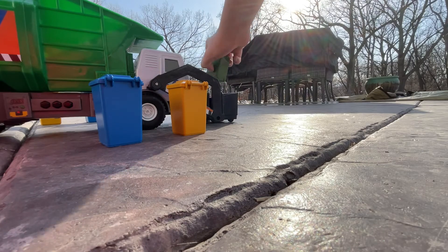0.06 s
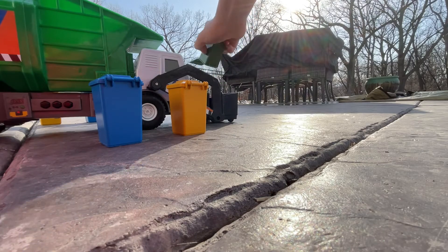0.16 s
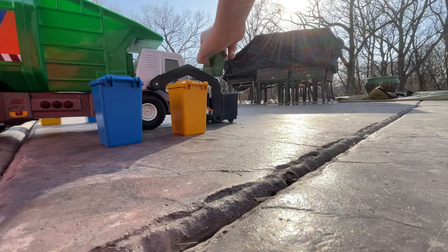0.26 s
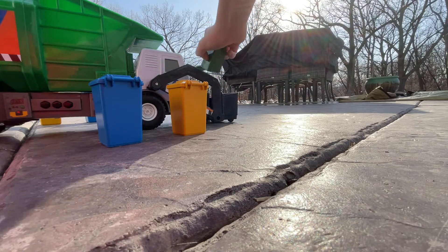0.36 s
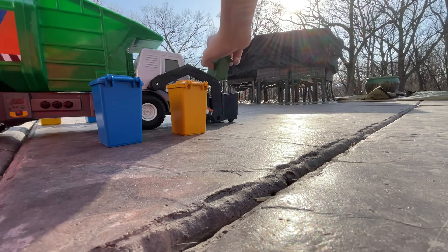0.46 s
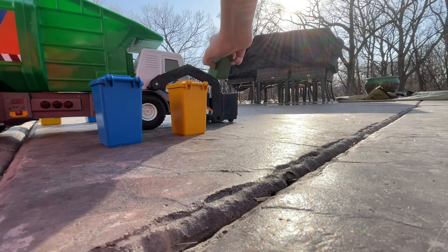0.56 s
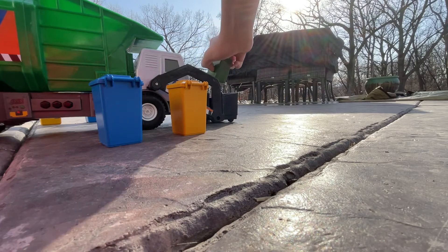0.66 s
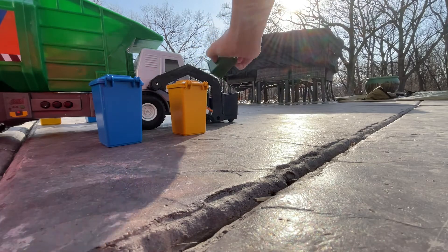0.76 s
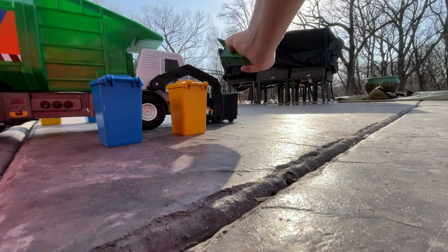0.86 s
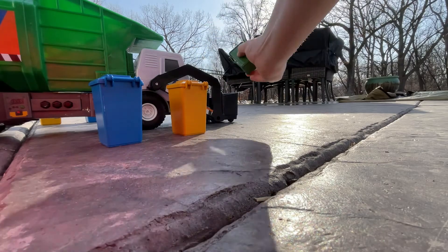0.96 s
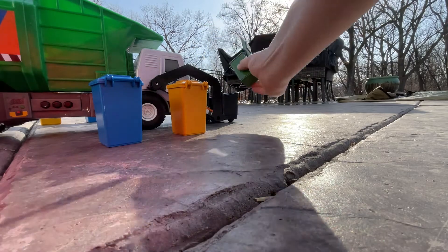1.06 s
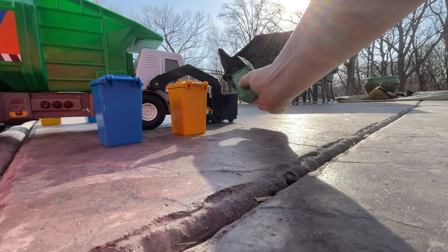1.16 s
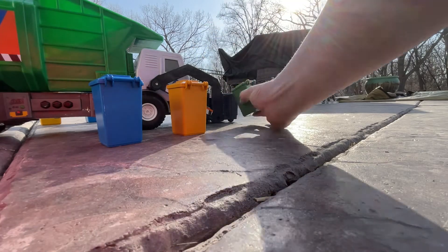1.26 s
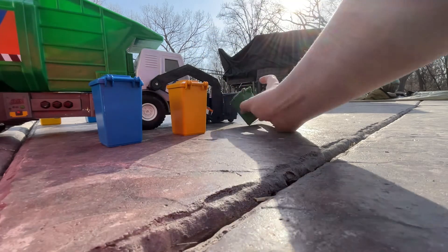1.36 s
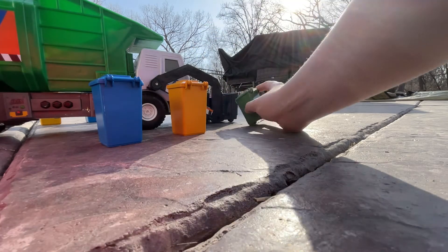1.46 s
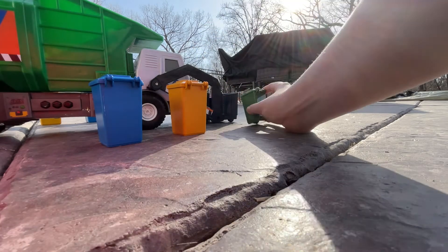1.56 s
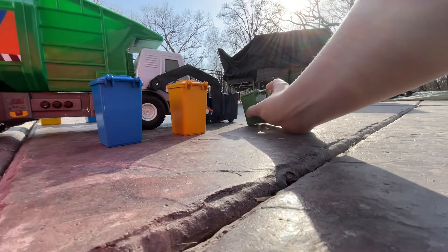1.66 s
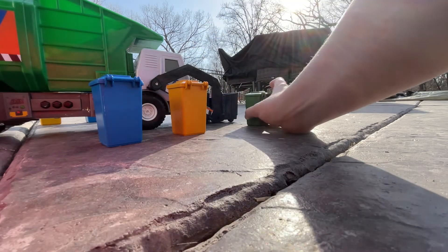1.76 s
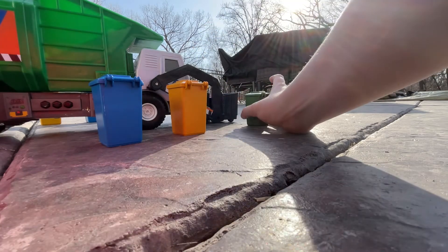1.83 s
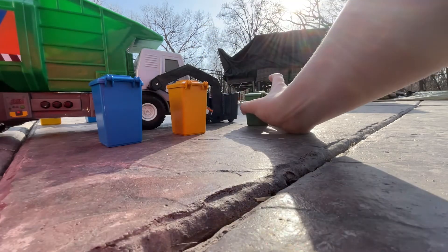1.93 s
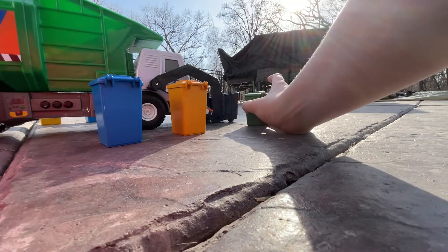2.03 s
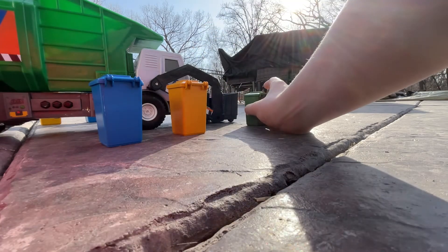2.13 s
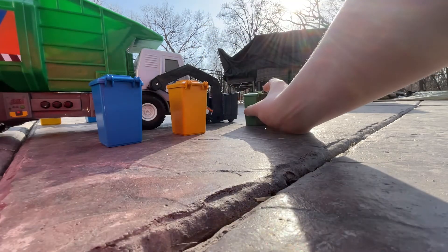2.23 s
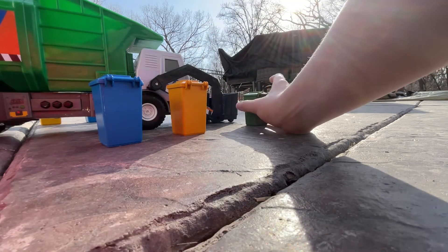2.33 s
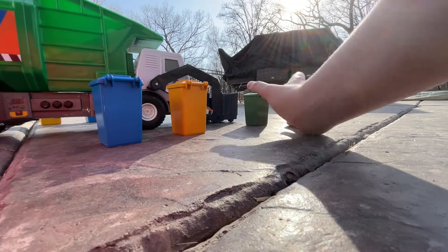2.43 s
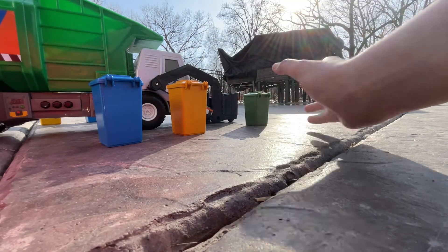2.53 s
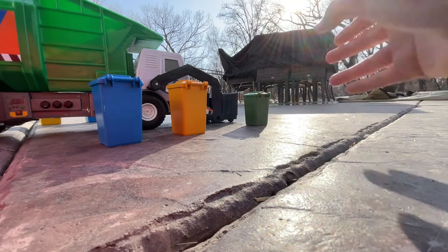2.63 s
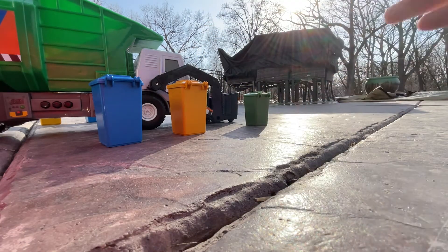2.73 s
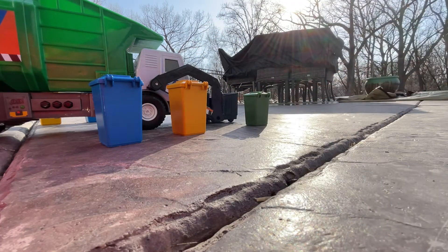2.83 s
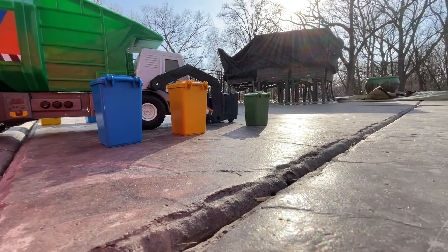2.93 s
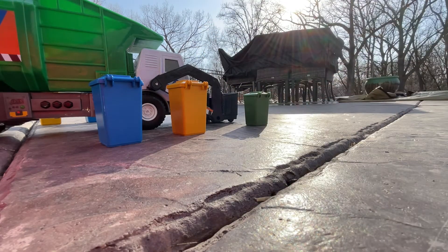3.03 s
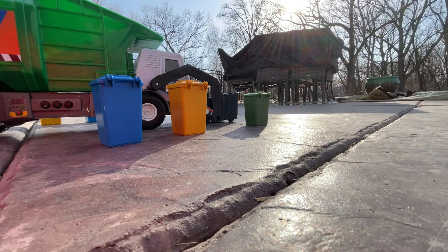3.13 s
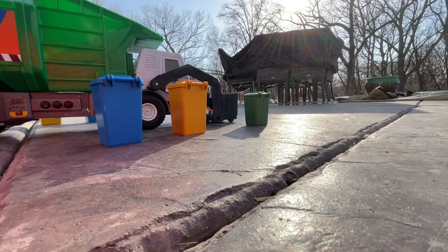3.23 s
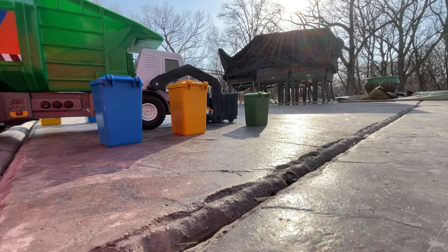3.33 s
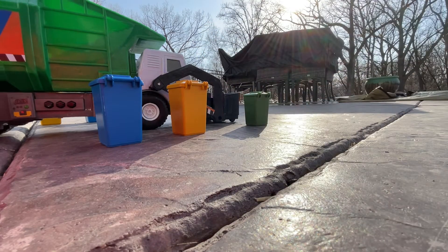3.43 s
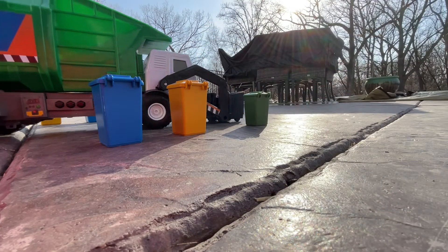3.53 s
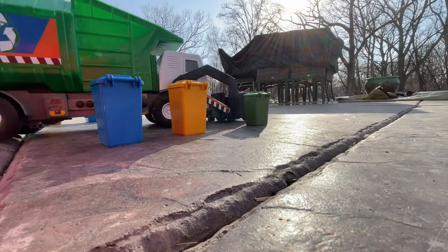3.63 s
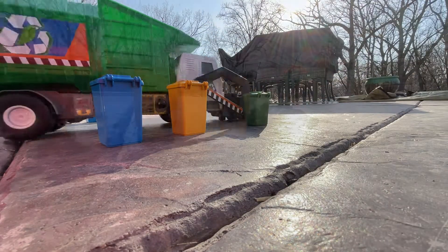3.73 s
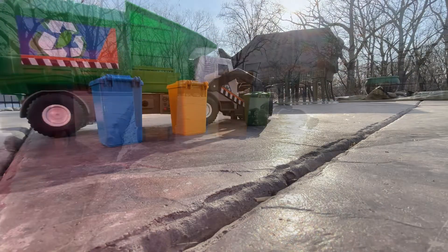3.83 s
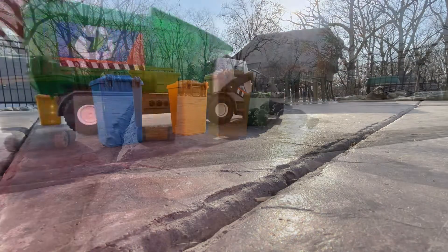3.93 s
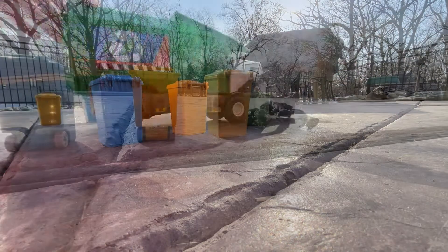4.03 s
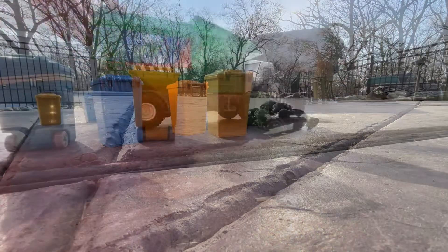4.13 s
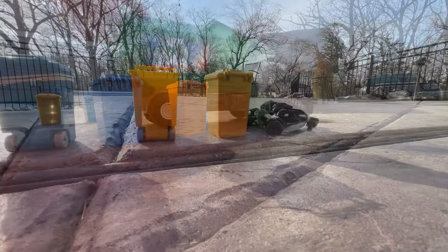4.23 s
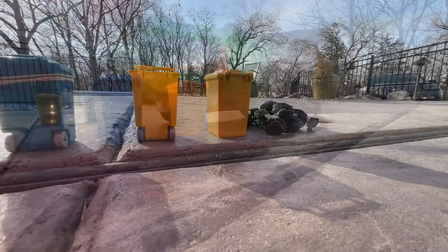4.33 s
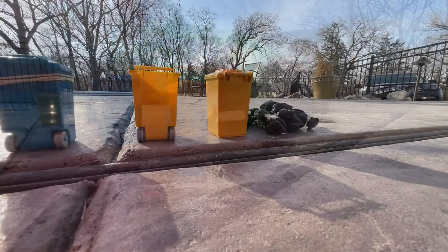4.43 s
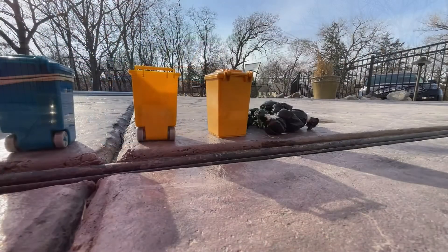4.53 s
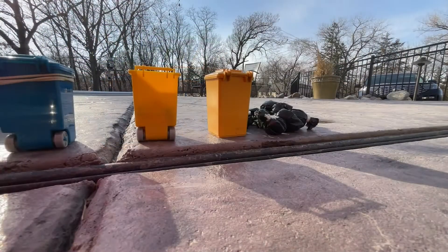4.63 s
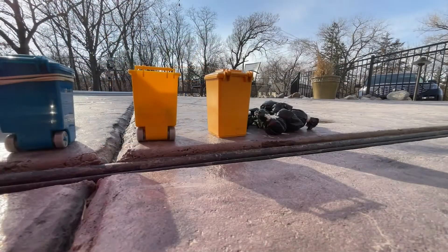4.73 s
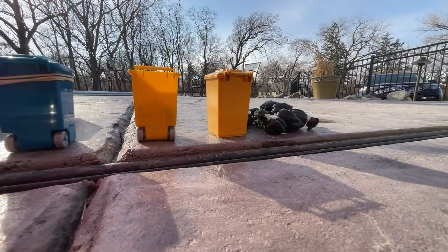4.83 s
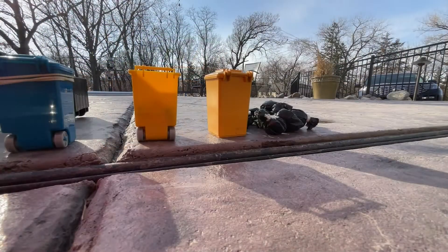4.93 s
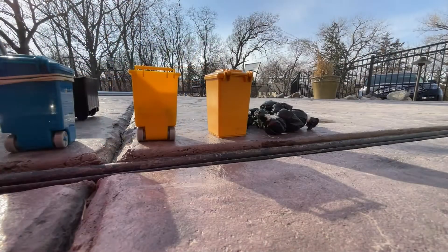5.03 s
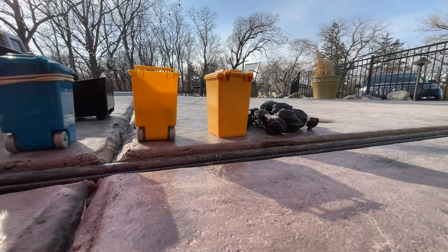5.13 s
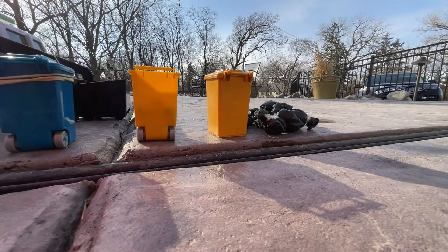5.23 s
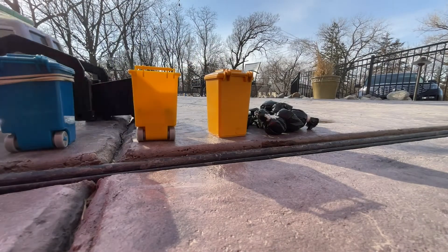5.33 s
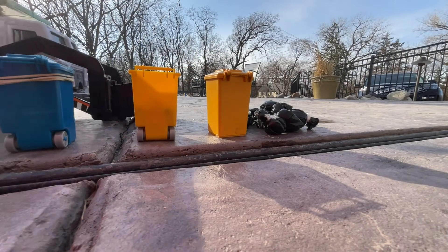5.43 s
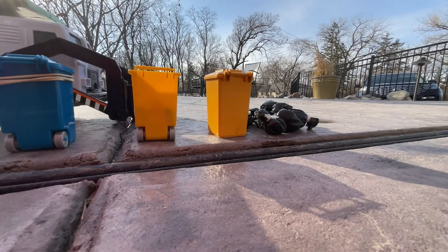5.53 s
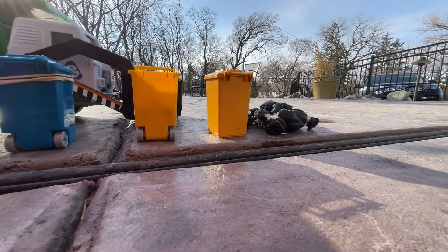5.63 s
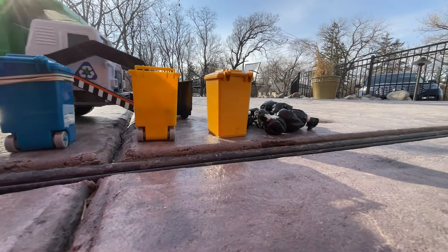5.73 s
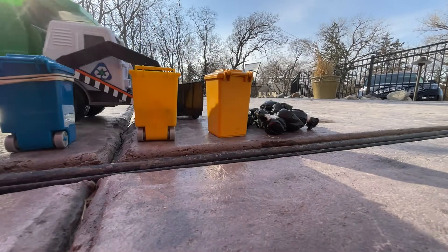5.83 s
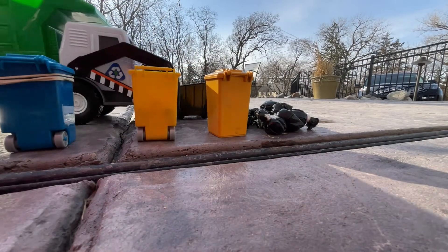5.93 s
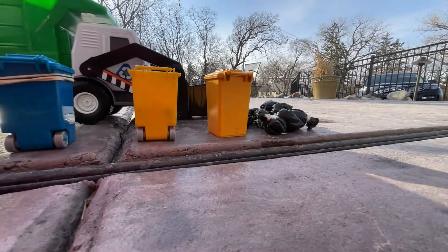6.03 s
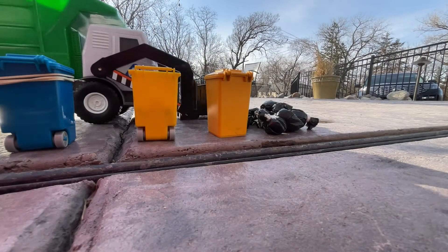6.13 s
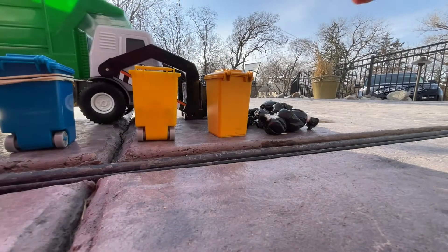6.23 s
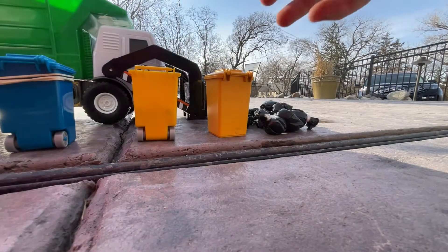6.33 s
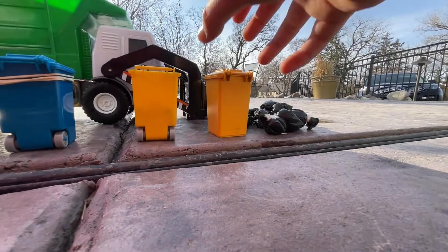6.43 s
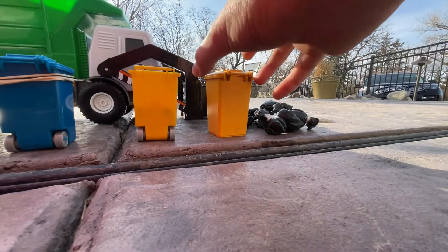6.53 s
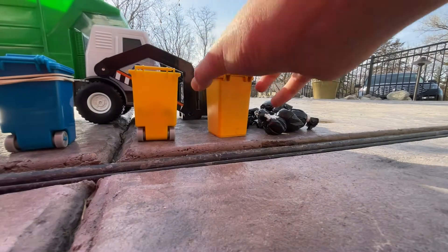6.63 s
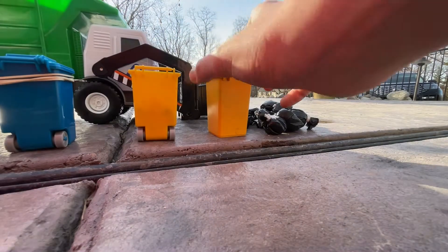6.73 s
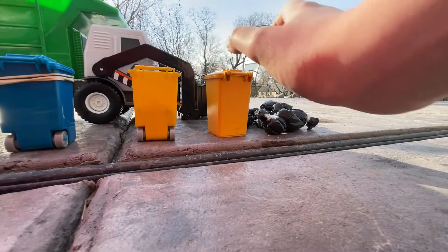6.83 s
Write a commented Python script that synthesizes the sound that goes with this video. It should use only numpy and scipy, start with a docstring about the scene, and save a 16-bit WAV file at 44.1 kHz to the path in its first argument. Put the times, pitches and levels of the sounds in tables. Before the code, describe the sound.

Close stereo microphone low on a rough slab in an open yard, with very little echo. Soft far traffic and tiny bird notes, then a cluster of dry plastic clacks and drags as a little bin is placed. A gentle hand rustle follows. A hollow toy truck clatters along with loose knocks and low rumble, slows, squeaks faintly and stops, leaving traffic and wind buffeting.

```python
"""Taps on a small plastic bin, set down on a concrete drive; a brushing hand; then a toy truck rolling by.
Far traffic and a low rumble lie beneath, birds call faintly, and late on wind buffets the close microphone ports.
Random pushes and grit ring the modes of bin and truck; shaped noise makes traffic, rumble, wheels and skin;
sliding tones make birds and squeaks, and decaying sines make thumps. Two close ports hear the near sounds
with different colour and lag, and the yard adds scatter."""
import sys
import numpy as np
from scipy import signal
from scipy.fft import rfft, irfft, next_fast_len
from scipy.io import wavfile
from scipy.ndimage import uniform_filter1d, map_coordinates

SR = 44100
rng = np.random.default_rng(int(sys.argv[2]) if len(sys.argv) > 2 else 0)


def digitize_waveform(pressure):
    """Quantize a signal to 16-bit integers and store it at the path in sys.argv[1].

    Rows of a 2-D input are taken as channels; values are limited to [-1, 1].
    """
    field = np.atleast_2d(pressure).T
    bounded = np.clip(field, -1, 1)
    quanta = np.round(bounded * 32767).astype(np.int16)
    wavfile.write(sys.argv[1], SR, quanta)


N = 303408


def amp(db):
    """dB to gain."""
    return 10 ** (np.asarray(db) / 20)


def unit(x):
    """Scale to rms 1."""
    return x / np.sqrt(np.mean(x ** 2) + 1e-20)


def along(points, hz):
    """Interpolate (Hz, value) points on a log frequency axis."""
    f, v = np.transpose(points)
    return np.interp(np.log(hz + 1), np.log(f + 1), v)


def level(rows):
    """One gain per sample from (start_s, level_db) points, all but silent outside the table."""
    s, db = np.transpose(rows)
    return amp(np.interp(np.arange(N) / SR, s, db, -150, -150))


def wobble(rate):
    """A smooth random curve, rate knots a second."""
    knots = rng.standard_normal(int(N * rate / SR) + 4)
    return map_coordinates(knots, [np.arange(N) * rate / SR])


def filtered(x, response):
    """Multiply the spectrum of x by a function of frequency."""
    m = next_fast_len(N + SR // 2)
    return irfft(rfft(x, m) * response(np.fft.rfftfreq(m, 1 / SR)), m)[..., :N]


def noise(spectrum):
    """Coloured noise of rms 1."""
    def response(f):
        return amp(np.where(f < spectrum[0][0], -120, along(spectrum, f)))
    return unit(filtered(rng.standard_normal(N), response))


def highpass4(f, corner_hz):
    """A steep high-pass without phase shift."""
    return f ** 4 / (f ** 4 + corner_hz ** 4)


def glide(start, end, first_hz, last_hz):
    """Progress 0-1 and phase of a tone that slides, quickly at first."""
    u = np.linspace(0, 1, min(round(end * SR), N) - round(start * SR))
    hz = first_hz + (last_hz - first_hz) * (1 - np.exp(-4 * u))
    return u, 2 * np.pi * np.cumsum(hz) / SR


def slide(start, end, db, fade_db_per_s, swell):
    """Gain of one sliding stroke: soft ends, a rounded swell, a steady fade."""
    edge_s = 0.003
    t = np.arange(N) / SR
    u = np.clip((t - start) / (end - start), 0, 1)
    ends = np.clip(np.minimum(t - start, end - t) / edge_s, 0, 1)
    return ends * np.abs(np.sin(np.pi * u)) ** swell * amp(db - fade_db_per_s * (end - start) * u)


def ringing(modes, f, detune=1):
    """Causal resonance of each mode, one row a mode, with alternating signs."""
    hz, db, t60 = np.transpose(modes)[:, :, None]
    hz, width = hz * detune, np.log(1000) / (np.pi * t60)
    sign = (-1.) ** np.arange(len(modes))[:, None]
    return sign * amp(db) * 1000j * f / (hz * hz - f * f + 1j * f * width)


def flexing(force, modes, stretch):
    """A shell flexes as it moves, so its modes drift between three tunings; rms 1."""
    tunings = []
    for k in (-1, 0, 1):
        rung = filtered(force, lambda f: ringing(modes, f, 1 + k * stretch).sum(0))
        tunings.append(amp(2.1 * wobble(14)) * rung)
    return unit(sum(tunings))


def grit(rate, spread_db):
    """Tiny random impacts, rate a second, on the rough slab; their sizes scatter in dB."""
    sizes = amp(spread_db * np.minimum(rng.exponential(size=N), 2.5))
    return (rng.random(N) < rate / SR) * sizes * rng.uniform(-1.215, 1, N)


def blows(events, modes, contact_s, spread, low_hz, high_hz, crack_db, gain_db):
    """Each contact is a short rattle that rings the modes at new strengths and tunings."""
    attack_s = .0004
    snap_s, snap_hz = 0.0022, 4566  # above snap_hz the contact rattles more briefly
    size = 4096
    t, f, out = np.arange(size) / SR, np.fft.rfftfreq(size, 1 / SR), np.zeros(N + size)
    rattle = (1 - np.exp(-t / attack_s)) * np.exp(-t / np.array([[contact_s], [snap_s]]))
    fade = np.cos(np.linspace(0, np.pi / 2, size // 2) ** 2 * 2 / np.pi)
    high = highpass4(f, snap_hz)
    for s, db, low_db, high_db in events:
        force = rfft(rng.standard_normal(size) * rattle)
        # even push across the spectrum
        slow, snap = force / np.sqrt(uniform_filter1d(np.abs(force) ** 2, size=35))
        force = (1 - high) * slow + high * snap
        detune = 1 + spread * rng.standard_normal((len(modes), 1))
        strengths = amp(rng.normal(0, 1.9, len(modes)))
        shell = strengths @ ringing(modes, f, detune) + amp(crack_db)
        colour = amp(along([(low_hz * .5, low_db), (low_hz, 0), (high_hz * 0.57, 0),
                            (high_hz * 1.8, high_db), (11000, high_db), (16000, high_db - 12.5)], f))
        # the middle band sets the level of the whole hit
        band = irfft(force * shell * (f > low_hz) * (f < high_hz))
        peak = np.sqrt(uniform_filter1d(band ** 2, size=130).max())
        hit = irfft(force * shell * colour * f ** 2 / (f ** 2 + 260 ** 2)) / peak / 2
        out[round((s - attack_s) * SR):][:size // 2] += amp(db + gain_db) * hit[:size // 2] * fade
    return out[:N]


# Colour of the far traffic: (pitch_hz, relative level_db)
TRAFFIC_COLOUR = [(120, -43.5), (200, -7), (270, -11), (420, -7), (640, -10.5), (1100, -19.5),
                  (2000, -35.5), (3200, -38.5), (4500, -49), (9000, -50.5), (12000, -72), (16000, -76.5)]
# Gain on the traffic's far treble: (start_s, relative level_db)
FAR_HISS_LEVEL = [(0, 0.5), (3.4, 8), (4.4, -8), (6.3, 10.5), (6.88, 0)]


def traffic():
    """Far traffic is noise: a dull, wavering roar and a faint hiss above it."""
    roar = amp(-59.5 + 0.63 * wobble(5.4)) * noise(TRAFFIC_COLOUR)
    hiss = filtered(roar, lambda f: highpass4(f, 1000.0))
    return roar - hiss + level(FAR_HISS_LEVEL) * hiss


# Colour of the deep rumble: (pitch_hz, relative level_db)
DEEP_COLOUR = [(20, -59.5), (35, -21), (50, 11.5), (68, 14), (85, 13), (115, 6), (150, -55.5)]
# Colour of the upper rumble: (pitch_hz, relative level_db)
UPPER_COLOUR = [(70, -40), (110, -3.5), (200, -6), (290, -11), (420, -29.5), (700, -86.5)]
# Wind on the microphone ports: (start_s, level_db of the upper band before its wobble)
WIND_LEVEL = [(5.7, -42.5), (6.0, -47), (6.45, -45), (6.88, -37)]


def rumble():
    """Low noise: a steady floor, lumpy bass the wheels send through the slab, and wind late on."""
    calm_deep_db, calm_upper_db = -50.5, -52.5
    shake_deep_db, shake_upper_db = -9, -6.5  # against the rolling level
    wind_deep_db = -2.5  # deep band against the upper
    wheels = level(ROLLING_LEVEL) * amp(1.5 * wobble(5.2))
    wind = level(WIND_LEVEL)
    deep = np.sqrt(amp(calm_deep_db) ** 2 + (amp(shake_deep_db) * wheels) ** 2 + (amp(wind_deep_db) * wind) ** 2)
    upper = np.sqrt(amp(calm_upper_db) ** 2 + (amp(shake_upper_db) * wheels) ** 2 + wind ** 2)
    return deep * noise(DEEP_COLOUR) + upper * unit(amp(1.9 * wobble(14)) * noise(UPPER_COLOUR))


# Faint bird notes: (start_s, end_s, first pitch_hz, last pitch_hz, level_db, roughness 0-1)
BIRD_NOTES = [(.05, .2, 3060, 3030, -84, 0.7), (.12, .21, 3770, 3720, -93, .6),
              (.22, .32, 3050, 3030, -90, .6), (.3, .38, 3750, 3710, -90, .6),
              (.33, .375, 2150, 3280, -80, 0.4), (.468, .51, 2170, 3300, -82, .4),
              (.49, .58, 3970, 3930, -93, .6), (.607, .645, 2150, 3250, -79, .4),
              (0.74, .775, 2150, 3230, -74.5, 0.4), (.78, .9, 2810, 2780, -83, 0.3),
              (.96, 1.04, 2800, 2820, -100, 0.4), (1.03, 1.06, 3320, 3450, -83, .4)]


def birds():
    """Far birds: thin sliding tones, roughened by a fast random swell."""
    out = np.zeros(N)
    for start, end, first_hz, last_hz, db, rough in BIRD_NOTES:
        u, phase = glide(start, end, first_hz, last_hz)
        swell = np.sin(np.pi * u) ** 0.42 * (1 + rough * wobble(120)[:len(u)])
        out[round(start * SR):][:len(u)] += amp(db) * swell * np.sin(phase)
    return out


# Strokes of skin and cloth, and the fine hiss of the bin's drag (1.225-1.52 s):
# (start_s, end_s, relative level_db, relative sheen level_db, swell roundness 0-1)
SOFT_STROKES = [(0.734, 0.844, -85.5, -100, .5), (1.225, 1.33, -75.5, -69.5, .1),
                (1.335, 1.52, -76, -68.5, .1), (2.307, 2.443, -70, -70, .5), (2.44, 2.59, -76.5, -99, 0.37),
                (2.586, 3.171, -67, -63, 0.7), (3.204, 3.465, -69.5, -73.5, .05)]
# Colour of the soft body of a stroke: (pitch_hz, relative level_db)
STROKE_COLOUR = [(800, -58), (1800, -4.5), (3500, -12), (5800, -6.5), (7600, -9.5), (9300, -3),
                 (10500, -18), (14000, -46)]
# Colour of the top sheen: (pitch_hz, relative level_db)
SHEEN_COLOUR = [(8000, -10), (11000, 0), (13000, -11.5), (15500, -7)]


def soft_strokes():
    """Soft noise of skin and sleeve sliding, and the bin's fine drag hiss; a top sheen dulls along each stroke."""
    sheen_fade_db_per_s = 77.5
    body = sum(slide(start, end, db, 0, swell) for start, end, db, _, swell in SOFT_STROKES)
    sheen = sum(slide(start, end, db, sheen_fade_db_per_s, swell) for start, end, _, db, swell in SOFT_STROKES)
    return amp(7.0 + 0.88 * wobble(55)) * (body * noise(STROKE_COLOUR) + sheen * noise(SHEEN_COLOUR))


# Contacts of the bin: (start_s, relative level_db, low thud level_db, treble level_db)
BIN_TAPS = [(1.0974, -50.5, -3, -7), (1.128, -34.5, -32, -32), (1.154, -40, -27.5, -34),
            (1.1872, -43.5, 10.5, -17), (1.2196, -14, 13.5, 7), (1.291, -33.5, -8, -22),
            (1.3295, -5, 4, -6), (1.346, -22.5, -7.5, -15.5), (1.3937, -32.5, 18, -16.5),
            (1.42, -35, 4, -11), (1.439, -39, -10, -10), (1.463, -29.5, 12.5, -11),
            (1.5383, -36.5, 11, -15), (1.5734, -45, -11, -4), (1.5996, -26.5, 6, -10.5),
            (1.678, -35.5, -3.5, -6), (1.6846, -28, 4, -9.5), (1.691, -26.5, -1, -7), (1.6972, -7, 6.5, 0),
            (1.7305, -21.5, 15, 4.5), (1.76, -35, -20.5, -8), (2.077, -44.5, 2, -7.5),
            (2.0875, -27.5, -6, -14), (2.139, -41, 0, -11), (2.107, -36, 13, -10), (2.124, -45, -2.5, -10)]
# Modes of the plastic bin: (pitch_hz, relative level_db, t60_s)
BIN_MODES = [(320, -14, .015), (480, -6.5, 0.024), (636, -6, 0.025), (796, -1, 0.023), (1154, -2, 0.022),
             (1548, 0, 0.04), (1950, -2.5, 0.022), (2130, -5, .035), (2746, -2, 0.017), (3410, -2.5, 0.012),
             (4040, -7.5, 0.024), (4590, -4, 0.034), (5070, -4, .012), (5780, -3.5, 0.015),
             (6440, -2.5, 0.016), (7100, -1.5, 0.014), (8700, -1.5, 0.0074), (10400, -10.5, 0.0099)]
# The bin drags in the fingers: (start_s, end_s, relative level_db, fade_db_per_s)
BIN_DRAGS = [(1.122, 1.18, -63.5, 106), (1.184, 1.222, -53.5, 9), (1.218, 1.335, -56, 130),
             (1.33, 1.491, -65.5, -0.5), (1.5, 1.554, -77, -2), (1.589, 1.7, -58.5, 111),
             (1.734, 1.887, -47.5, 233), (2.074, 2.184, -58, 225)]


def bin_handling():
    """Taps ring the bin's modes, and grit rattles its shell while it drags."""
    drag = sum(slide(*row, swell=0) for row in BIN_DRAGS)
    scrape = grit(3500, spread_db=3) * amp(2.5 * wobble(60))
    shell = flexing(scrape, BIN_MODES, stretch=0.026)
    shell = unit(filtered(shell, lambda f: 1 / (1 + (f / 7000) ** 2)))
    taps = blows(BIN_TAPS, BIN_MODES, contact_s=0.0035, spread=0.018, low_hz=920, high_hz=3300,
                 crack_db=0.0, gain_db=-0.5)
    return taps + amp(11.0) * drag * shell


# Rolling of the truck, which also drives its rattles and slab rumble: (start_s, relative level_db)
ROLLING_LEVEL = [(3.37, -64), (3.449, -41), (3.6, -38.5), (3.731, -34), (3.81, -28), (3.95, -34),
                 (4.249, -36), (4.61, -36.5), (5.1, -33.5), (5.4, -36.5), (5.86, -39), (6.0, -43.5),
                 (6.15, -51), (6.269, -48), (6.327, -82.5), (6.49, -52.5), (6.629, -59.5), (6.72, -89)]


def rattles():
    """Small knocks at random moments until the truck halts, as strong as the rolling lets them be."""
    per_s, stop_s = 85, 6.28
    over_rolling_db, spread_db = 2.5, 2
    thud_db, treble_db = -4, -9
    s, level_db = np.transpose(ROLLING_LEVEL)
    draws = rng.random((290, 2))
    times = s[0] - np.cumsum(np.log(1 - draws[:, 0])) / per_s
    sizes_db = np.interp(times, s, level_db) + over_rolling_db - spread_db * np.log(1 - draws[:, 1])
    return [(t, db, thud_db, treble_db) for t, db in zip(times, sizes_db) if t < stop_s]


# Knocks of the truck's loose parts: (start_s, relative level_db, low thud level_db, treble level_db)
TRUCK_KNOCKS = [(3.4092, -41.5, 4, 23), (3.427, -32.5, 24, -21), (3.441, -38, 26.5, -16),
                (3.454, -36, 29.5, -24), (3.477, -26.5, -2, -28), (3.488, -35, 23, -21),
                (3.553, -27.5, 0, -4.5), (3.562, -30, 12, -19), (3.599, -16.5, 6, -7),
                (3.613, -8.5, -2.5, -12), (3.619, -4, -11, -20), (3.628, -17.5, 5.5, -2.5),
                (3.742, -18.5, -4, -9.5), (3.784, -37, 8, -45), (3.796, -13.5, -5, -15),
                (3.863, -18.5, 3.5, -24), (3.922, -16, 9.5, -26.5), (3.943, -26.5, 16, 6),
                (3.9625, -15, 4, 23.5), (4.009, -14, -12, -23), (4.035, -22.5, 1, -10),
                (4.068, -37, -5, 6.5), (4.116, -47, -1.5, -27), (4.156, -21.5, 6.5, -27),
                (4.301, -18.5, -5, -21.5), (4.364, -42, -23, -44), (4.445, -16.5, -7, -13),
                (4.488, -24, -27, -8), (4.529, -23.5, -33, -19), (4.575, -20, -9, -10),
                (4.62, -28, -10, -20.5), (4.7, -28, 14.5, -3), (4.766, -28.5, -14, -16),
                (4.778, -15.5, -2, -19), (4.852, -23, 1, -2.5), (4.917, -15, -10, -25),
                (5.024, -36, -11.5, -6), (5.077, -5, -28, -13.5), (5.143, -20.5, -30.5, -14),
                (5.199, -20.5, 7, -6.5), (5.258, -22, -6, -4.5), (5.266, -14.5, -1, -6),
                (5.277, -16.5, 6, 8), (5.291, -14.5, -11.5, 3), (5.346, -14, -16.5, -7),
                (5.394, -25.5, -22, -27), (5.483, -12.5, -21, -2.5), (5.5, -20, -4, 6.5),
                (5.542, -22.5, 7.5, 0.5), (5.571, -33, -3, -24), (5.724, -34, 23, -17),
                (5.737, -15, 5.5, -10), (5.776, -20, 8.5, -53), (5.811, -27.5, 12, -29),
                (5.85, -33.5, -3, -0.5), (5.893, -35.5, 7, 6), (5.957, -33.5, 23, -23.5),
                (6.059, -30.5, 4, -22), (6.07, -29, -7, -35), (6.25, -43.5, 15.5, -20),
                (6.4, -53, -6.5, 1.5), (6.437, -52.5, -6, 12.5), (6.511, -49.5, 4.5, 17.5),
                (6.548, -47.5, 20.5, -31), (6.845, -54.5, 0, -27), (6.87, -58.5, -17, -25)]
# Modes of the hollow truck body: (pitch_hz, relative level_db, t60_s)
TRUCK_MODES = [(360, -3, .035), (420, 0, .04), (480, -1, .035), (600, -3, .03), (700, -6.5, .025),
               (990, -2, .022), (1150, -3, .02), (1380, -1, .018), (1650, -1.5, .022), (1920, -3.5, .014),
               (2350, -6, .012), (2870, -6, .012), (3500, -8, .008), (4500, -10, .007), (5600, -11, .006),
               (7000, -12, .005)]
# Upper modes of the rolling body: (start_s, relative level_db)
CLATTER_LEVEL = [(3.37, -66), (3.46, -47), (3.57, -50.5), (3.6, -45), (3.82, -34.5), (3.89, -37),
                 (4.24, -39), (4.41, -44.5), (4.82, -39.5), (5.08, -37.5), (5.38, -37.5), (5.49, -47.5),
                 (5.81, -48), (6.15, -57.5), (6.29, -67), (6.72, -70)]
# Hiss of the wheels: (start_s, relative level_db)
WHEEL_HISS_LEVEL = [(3.37, -73), (3.46, -51.5), (3.58, -50.5), (3.72, -44.5), (3.84, -45), (4.26, -47.5),
                    (4.45, -51), (5.11, -45.5), (5.72, -50), (5.88, -51), (6.13, -58.5), (6.26, -57),
                    (6.41, -81), (6.64, -82.5), (6.72, -96)]
# Colour of wheels on grit: (pitch_hz, relative level_db)
GRIT_COLOUR = [(1500, -37.5), (2200, -0.5), (2900, 5), (3200, -3), (4500, -3.5), (7000, -3), (9500, -5.5),
               (11500, -19), (14000, -26.5), (16000, -35)]


def truck():
    """Hard wheels on rough concrete shake the hollow body; loose parts knock."""
    body_top_hz = 4800  # the rolling body is dull above this
    # rough and smooth patches of slab shake upper body and wheels together
    bumps = amp(2.5 * wobble(24))
    shake = grit(900, spread_db=2.0) * amp(2.3 * wobble(70))
    below = flexing(shake, TRUCK_MODES[:5], stretch=0.0075)
    above = flexing(shake + grit(1200, spread_db=4.5), TRUCK_MODES[5:10], stretch=0.034)
    body = amp(3.0) * level(ROLLING_LEVEL) * below + amp(2.5) * level(CLATTER_LEVEL) * bumps * above
    body = filtered(body, lambda f: 1 / (1 + (f / body_top_hz) ** 2))

    wheels = filtered(1.9 * shake + grit(9000, spread_db=-6.0), lambda f: amp(along(GRIT_COLOUR, f)))
    bright = filtered(wheels, lambda f: highpass4(f, 8800.0))
    # patches of coarser and finer grit
    wheels = unit(amp(1.5 * wobble(45)) * (wheels - bright) + amp(1.4 * wobble(30)) * bright)
    rolling = body + level(WHEEL_HISS_LEVEL) * bumps ** 0.87 * amp(-1.0) * wheels
    knocks = blows(TRUCK_KNOCKS + rattles(), TRUCK_MODES, contact_s=0.0032, spread=0.049,
                   low_hz=857, high_hz=3600, crack_db=-15.5, gain_db=-2.5)
    return rolling + knocks


# Low thumps, from bumps of the truck and then wind on the ports: (start_s, relative level_db, pitch_hz, t60_s)
LOW_THUMPS = [(3.729, -30, 144, 0.17), (4.471, -27, 81, 0.14), (5.189, -15, 144, 0.042),
              (5.07, -28, 75.5, 0.23), (5.27, -31.5, 73, 0.47), (5.389, -26.5, 114.8, 0.14),
              (5.52, -29, 71, 0.38), (5.68, -28, 114.4, 0.14), (6.063, -23.5, 114, 0.055),
              (6.281, -20.5, 93, 0.097), (6.521, -26, 82, 0.17), (6.609, -19, 62.6, 0.19),
              (6.647, 6, 74, 0.017), (6.678, -19.5, 120, 0.1), (6.734, -10, 69, 0.1),
              (6.767, -16, 126.7, 0.079), (6.829, -28.5, 143, 0.17), (6.854, -9.5, 99, 0.051)]


def thumps():
    """Each thump is a low sine that swells in softly and dies away."""
    out, t = np.zeros(N + SR), np.arange(SR // 4) / SR
    for s, db, hz, t60 in LOW_THUMPS:
        envelope = amp(db + 3.5 - 60 * t / t60) * (1 - np.exp(-t / 0.0065)) ** 2
        # the swell begins 6 ms ahead of the listed time
        out[round((s - .006) * SR):][:len(t)] += envelope * np.sin(2 * np.pi * hz * t)
    return out[:N]


# Hum during the rolling: (start_s, relative level_db)
HUM_LEVEL = [(4.15, -61), (4.27, -36.5), (4.45, -42), (4.6, -33.5), (4.8, -41), (5.0, -44), (5.1, -55)]


def hum():
    """A low sine, wavering in pitch and level, while the truck rolls."""
    hz = 68.4 * (1 + 0.0098 * wobble(8.0))
    return level(HUM_LEVEL) * amp(2 + 1.5 * wobble(9)) * np.sin(2 * np.pi * np.cumsum(hz) / SR)


# Thin squeaks and fuzzy overtones as the truck slows and after it halts:
# (start_s, end_s, first pitch_hz, last pitch_hz, level_db, width_hz)
THIN_SQUEAKS = [(5.93, 5.99, 1265, 1244, -48.5, 50), (6.09, 6.175, 1262, 1250, -50, 50),
                (6.265, 6.385, 1258, 1244, -53, 50), (6.447, 6.495, 1256, 1246, -58, 50),
                (6.29, 6.4, 3740, 3720, -72, 40), (6.385, 6.68, 3720, 3590, -72, 30),
                (6.27, 6.52, 2460, 2640, -78, 350), (6.3, 6.5, 3050, 2900, -82, 350),
                (6.52, 6.72, 2700, 2600, -88, 350)]


def squeaks():
    """Sliding tones, made fuzzy by random swings of both phases, that come and go."""
    out = np.zeros(N)
    for start, end, first_hz, last_hz, db, width_hz in THIN_SQUEAKS:
        u, phase = glide(start, end, first_hz, last_hz)
        depth = width_hz / 90
        fuzz = (1 + depth * wobble(width_hz)[:len(u)]) * np.sin(phase)
        fuzz = fuzz + depth * wobble(width_hz)[:len(u)] * np.cos(phase)
        out[round(start * SR):][:len(u)] += amp(db) * np.sin(np.pi * u) ** 0.43 * fuzz
    return out


# Left microphone port over right: (pitch_hz, level_db)
PORT_TILT = [(200, -1), (380, -3.5), (800, 6), (1500, 1), (2400, 0), (4400, 0), (9000, -1.5), (12000, -2)]
# Lag of the right port: (pitch_hz, lag_radians)
PORT_LAG = [(0, 0), (400, .45), (1000, .6), (1500, .2), (1950, 1.5), (2250, 3.2), (2800, 5), (3600, 5.7),
            (5000, 7.6), (6300, 7.8), (8000, 12), (10000, 12.6), (22050, 12.6)]
# The lag wanders as toys and hand move: (pitch_hz, wander_radians_rms)
PORT_WANDER = [(250, 0.36), (500, 0.2), (860, 1), (1400, 0.77), (2300, 0.58), (3300, 0.5), (5500, 0.51),
               (7300, 2.4), (10000, 1.4), (14000, 1.2)]


def ports(x):
    """The right port hears the same sound with its own colour and a lag that wanders."""
    def pair(f):
        half_db = along(PORT_TILT, f) / 2
        return [amp(half_db), amp(-half_db) * np.exp(-1j * np.interp(f, *np.transpose(PORT_LAG)))]
    left, right = filtered(x, pair)
    hz, _, z = signal.stft(right, SR, nperseg=256, noverlap=192)
    field = uniform_filter1d(rng.standard_normal(z.shape), size=5, axis=0)
    field = unit(uniform_filter1d(field, size=40, axis=1))
    turn = np.exp(1j * along(PORT_WANDER, hz)[:, None] * field)
    turned = signal.istft(z * turn, SR, nperseg=256, noverlap=192)[1]
    return np.array([left, turned[:N]])


# Decay of the yard's scatter, before each use scales it: (pitch_hz, t60_s)
YARD_DECAY = [(300, 0.018), (2000, 0.11), (10000, 0.21)]


def yard(x, scale):
    """Slab, toys and fence scatter a decaying noise tail, different at each port."""
    hz, t, z = signal.stft(rng.standard_normal((2, SR // 4)), SR, nperseg=128)
    decay = amp(-60 * t / (scale * along(YARD_DECAY, hz)[:, None]))
    tail = signal.istft(z * decay, SR, nperseg=128)[1]
    tail = tail / np.linalg.norm(tail[0])
    scattered = signal.fftconvolve(np.pad(x, (30, 0))[None], tail, axes=1)[:, :N]
    return filtered(scattered, lambda f: f ** 2 / (f ** 2 + 600 ** 2))


# Far sound common to both ports: (pitch_hz, share 0-1)
COMMON_SHARE = [(300, 0.53), (600, 0.051), (1000, 0.21), (2000, 0.2), (5000, 0.12), (11000, 0.55)]


def scene():
    """Near toys with their scatter; the far field is partly common to both ports, the bass nearly all."""
    def share(f):
        return np.clip(along(COMMON_SHARE, f), 0, 1)
    far = filtered(ports(traffic()), lambda f: np.sqrt(share(f)))
    apart = filtered(np.array([traffic(), traffic()]), lambda f: np.sqrt(1 - share(f)))
    bass = rumble() + thumps() + hum() + amp(-18.0) * rumble() * [[1], [-1]]
    calls = birds()
    near = soft_strokes() + bin_handling() + truck() + squeaks()
    # scatter off the neighbouring toys and hand keeps changing as they move
    close = amp(-11.5) * sum(yard(near * wobble(10), scale=.15) for _ in range(3))
    tail = amp(-26.5) * sum(yard(near * wobble(6), scale=1.1) for _ in range(2))
    return ports(near) + close + tail + far + apart + bass + calls + yard(calls, scale=3)


def record(dry):
    """The recorder rounds off the loudest peaks, drops the deepest bass and keeps nothing above its band limit."""
    top_hz, bass_hz = 16100, 30
    rounded = dry / (1 + np.abs(dry / .9) ** 4) ** .25
    # the sound goes on past both ends, so the filter meets no edge
    held = np.pad(rounded, ((0, 0), (4096, 4096)), mode="reflect", reflect_type="odd")
    size = next_fast_len(held.shape[1])
    hz = np.fft.rfftfreq(size, 1 / SR)
    response = (1j * hz / (1j * hz + bass_hz)) ** 2 * (hz < top_hz)
    return irfft(rfft(held, size) * response, size)[:, 4096:4096 + N]


dry = scene()
out = record(dry)
digitize_waveform(out)
```